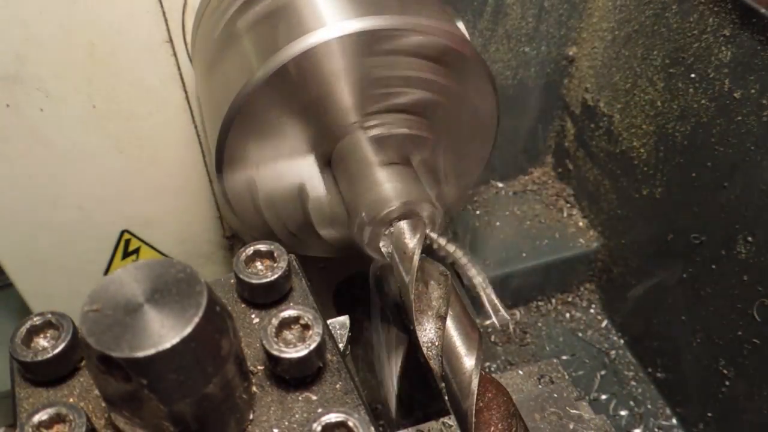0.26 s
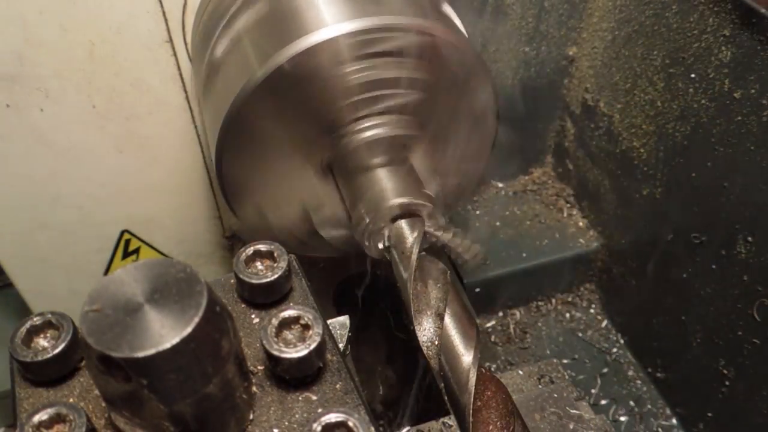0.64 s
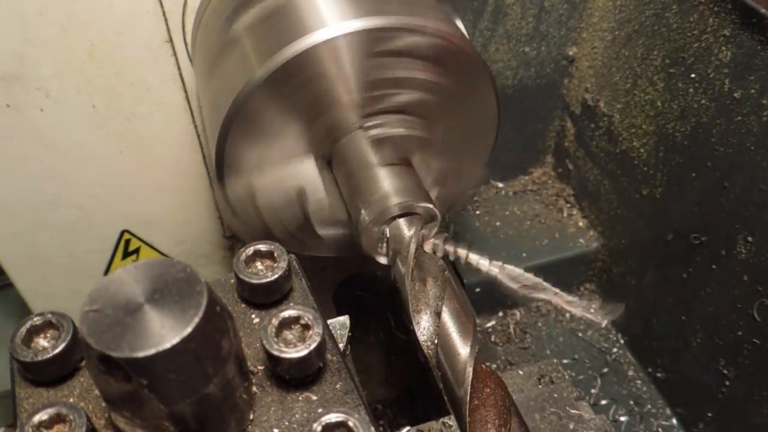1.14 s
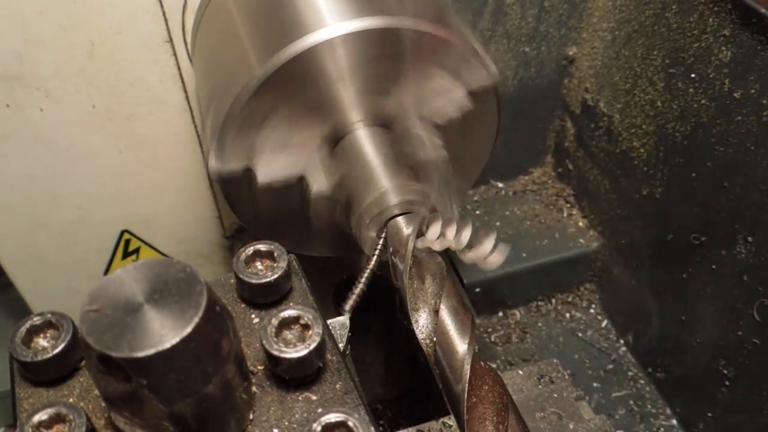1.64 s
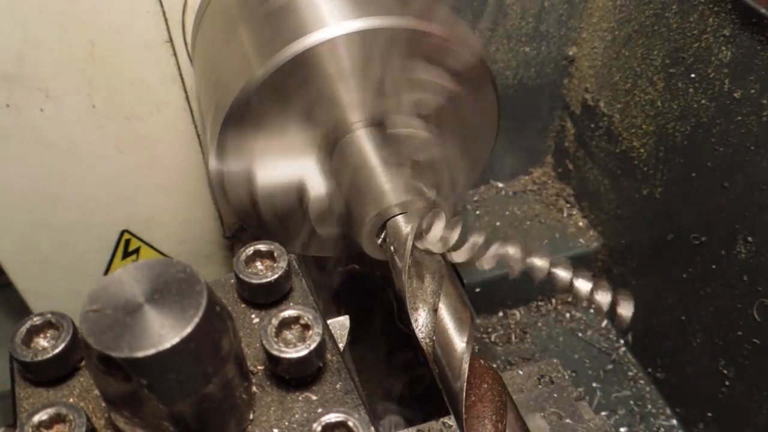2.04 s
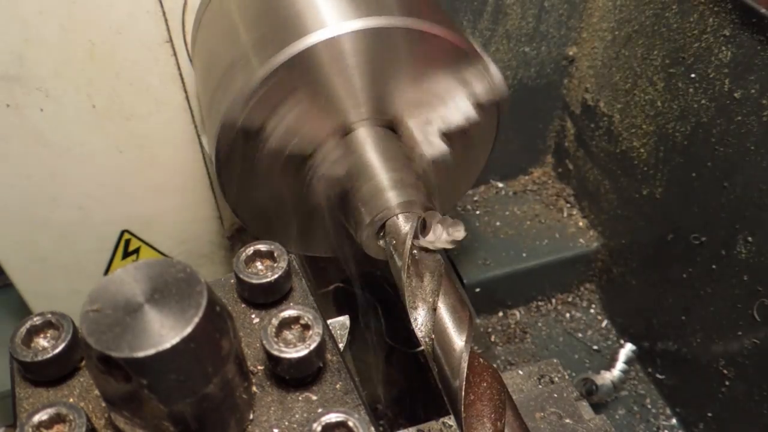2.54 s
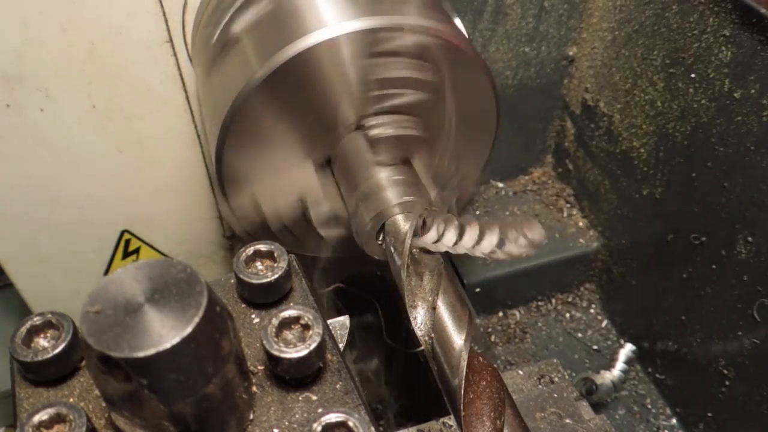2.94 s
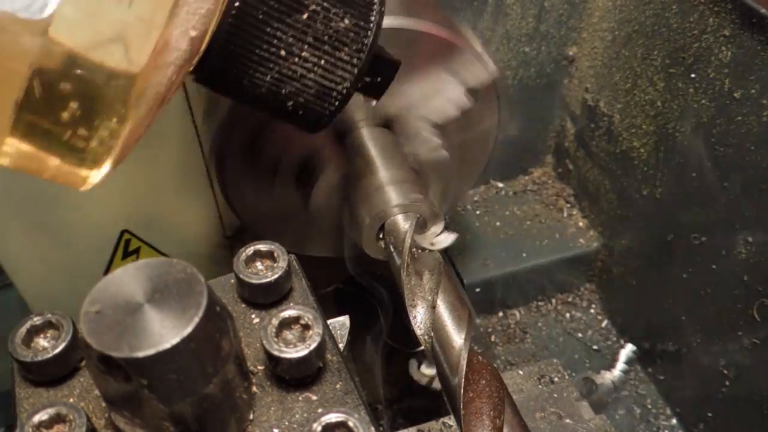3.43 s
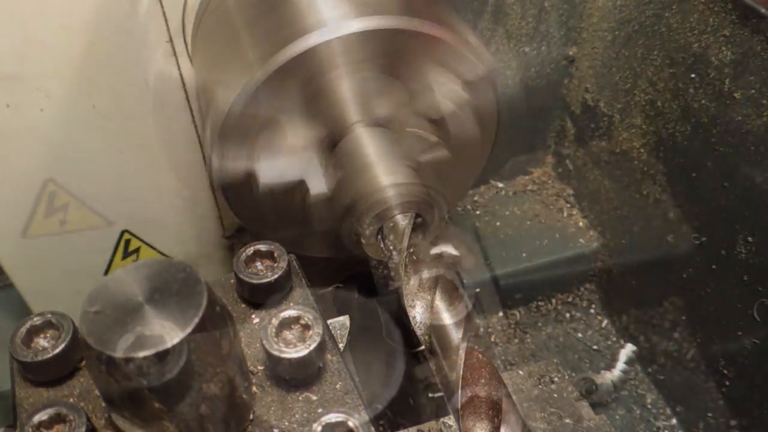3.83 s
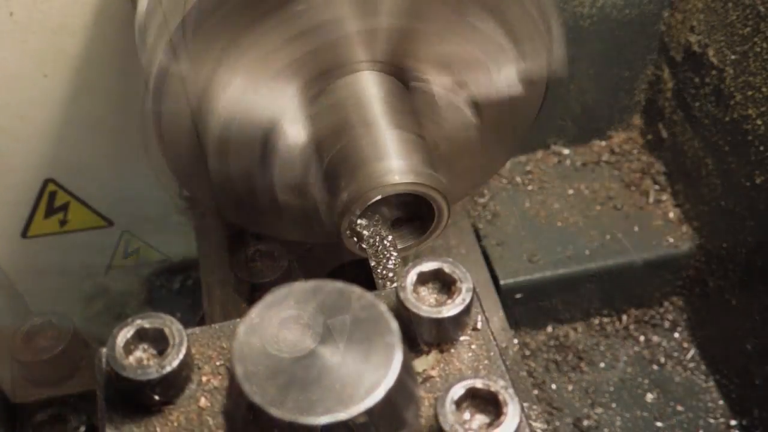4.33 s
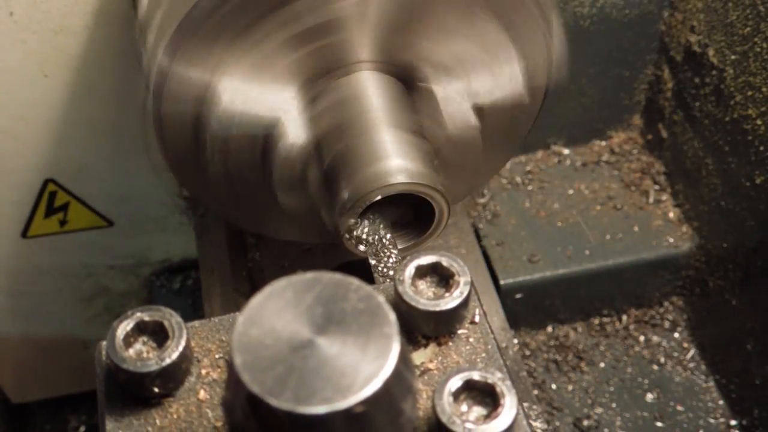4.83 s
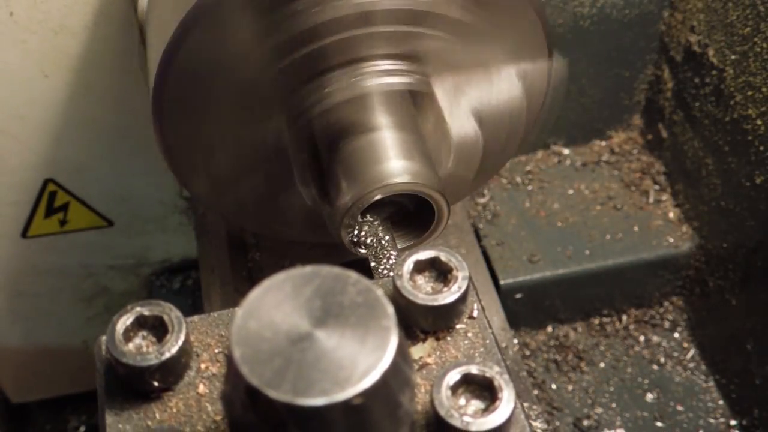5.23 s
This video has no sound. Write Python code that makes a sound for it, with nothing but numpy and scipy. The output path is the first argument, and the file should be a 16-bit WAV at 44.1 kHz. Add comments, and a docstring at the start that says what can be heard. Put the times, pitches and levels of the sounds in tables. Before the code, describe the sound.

Close metal drilling, a rough steady rasp with cracks and a brief chirping rub, gives way to soft hissing lathe work and falling squeaks.

```python
"""First a twist drill rasps and hisses into stainless steel spinning in a small lathe, straight ahead in stereo.
Friction noise rings through the resonances of drill and tool post; breaking chips knock, a loose one rubs.
The drilling fades into a light turning cut: slips at the tool tip squeal and drop in pitch as chips spit.
Behind it lie the hiss of a fine chip, the rumble and tones of the drive, and a low workshop floor."""
import sys
import numpy as np
from scipy import signal
from scipy.fft import rfft, irfft, next_fast_len
from scipy.io import wavfile

SR = 44100
rng = np.random.default_rng(int(sys.argv[2]) if len(sys.argv) > 2 else 0)


def digitize_waveform(pressure):
    """Quantize a signal to 16-bit integers and store it at the path in sys.argv[1].

    Rows of a 2-D input are taken as channels; values are limited to [-1, 1].
    """
    field = np.atleast_2d(pressure).T
    bounded = np.clip(field, -1, 1)
    quanta = np.round(bounded * 32767).astype(np.int16)
    wavfile.write(sys.argv[1], SR, quanta)


N = 241359
TIME = np.arange(N) / SR

# the flute packs with chips: (time [s], share of the duller packed colour [0-1])
FLUTE_PACKING = [(0, 0.04), (1.35, 0.19), (1.85, 0.54), (2.4, 0.6), (3.8, 0.58)]
# relative colour of the cutting lips, flute free and packed: (frequency [Hz], density [dB per Hz])
FREE_CUT_COLOUR = [(200, -23), (330, -23.5), (480, -15.5), (750, -3.5), (1200, -1.5), (1600, 2),
                   (2500, -2.5), (3200, 6), (3800, 1), (4400, 1.5), (4700, -11.5), (6000, -28)]
PACKED_CUT_COLOUR = [(180, -17.5), (300, -5.5), (470, -16), (750, -4.5), (1200, 2.5), (1900, 0),
                     (2400, 10.5), (3200, 2.5), (3800, -10), (4400, -2.5), (4700, -2), (6000, -39)]
# relative colour of the chip sliding in the flute: (frequency [Hz], density [dB per Hz])
FREE_SLIDE_COLOUR = [(3500, -43), (4800, 0), (6000, 1.5), (7600, 5.5), (8700, 2), (10800, -2.5), (13000, 2),
                     (13750, 1), (14500, -22), (15700, 7.5)]
PACKED_SLIDE_COLOUR = [(3500, 6), (4800, -0.5), (6000, 6), (7600, 0.5), (8700, 4), (10000, 7.5), (11600, 1),
                       (12500, -2), (13750, -6), (15700, -10)]
# the chip snags on the rim of the bore: (time of the middle [s], level [dB], length [s])
RIM_SNAGS = [(3.068, -22.5, 0.0067), (3.334, -21.5, 0.0043), (3.445, -25, 0.0054), (3.479, -27, 0.0074),
             (3.544, -23.5, 0.01), (3.567, -20.5, 0.0034)]


def drilling():
    """The cutting lips rasp and the chip hisses along the flute; both change colour as the flute packs."""
    rasp_db, hiss_db = drill_levels()
    packed = np.clip(in_time(FLUTE_PACKING)[0], 0, 1)

    def voiced(force, free_colour, packed_colour):
        """Blend the free and the packed sound of one contact force."""
        free = rms_one(through_tool(coloured(force, free_colour)))
        full = rms_one(through_tool(coloured(force, packed_colour)))
        return rms_one((1 - packed) * free + packed * full)

    cutting = friction(grains_per_s=2500, grain_db=-6.5, surge_db=0.77, surge_rate_hz=130)
    rasp = voiced(cutting, FREE_CUT_COLOUR, PACKED_CUT_COLOUR)
    sliding = friction(grains_per_s=1200, grain_db=-7.5, surge_db=1.3, surge_rate_hz=52)
    hiss = voiced(sliding, FREE_SLIDE_COLOUR, PACKED_SLIDE_COLOUR)
    # the chip comes off unevenly
    load = from_db(.65 * drift(45))
    cut = load * (from_db(rasp_db) * rasp + from_db(hiss_db) * hiss)
    snags = sum(swell(*snag) for snag in RIM_SNAGS)
    return cut + snags * (hiss + 0.41 * rasp)


# feed on the drill: (time [s], rasp level [dB], hiss level [dB])
DRILL_FEED = [(0, -21.5, -27), (.35, -21, -24), (1.3, -20, -25), (1.7, -20.5, -27), (2.1, -20.5, -25),
              (2.42, -21, -30), (3.2, -22.5, -29), (3.37, -22.5, -25.5), (3.6, -28.5, -29.5),
              (3.75, -26, -36.5)]
# the lips bite or slip: (time of the middle [s], length [s], change of rasp [dB], change of hiss [dB])
LIP_BITES = [(1.535, 0.027, -2.5, -6), (1.596, 0.01, 1.5, 2), (2.238, 0.11, -14, -3.5),
             (2.315, 0.044, -1.5, -9), (2.637, 0.035, 3, 5), (2.717, 0.071, -2.5, -0.5),
             (2.906, 0.035, -0.5, 4), (3.03, 0.044, 3, 3)]
FADE_START_S, FADE_DB_PER_S = 3.736, 49


def drill_levels():
    """Rasp and hiss in dB: the feed sets them, bites and slips swing them, and at last they fade."""
    fade_db = FADE_DB_PER_S * np.maximum(TIME - FADE_START_S, 0)
    rasp_db, hiss_db = in_time(DRILL_FEED) - fade_db
    for s, length, rasp_change, hiss_change in LIP_BITES:
        bite = swell(s, 0, length)
        rasp_db = rasp_db + rasp_change * bite
        hiss_db = hiss_db + hiss_change * bite
    return rasp_db, hiss_db


# resonances and hollows of drill, chuck and tool post: (frequency [Hz], width [Hz], lift [dB])
TOOLING_MODES = [(203, 39, -18), (281, 11.5, 9), (392, 9.6, 13.5), (569, 75, 13), (612, 23, -30),
                 (767.5, 19.4, 10), (812, 66, 3), (949.3, 10.5, 10.5), (992, 22.3, 11.5), (1078, 35, 3.5),
                 (1204, 100, -9.5), (1232, 6.1, 11.5), (1328, 29, 10.5), (1574, 146, 4.5), (1664, 33, 8),
                 (1760, 120, 1.5), (1960, 25, 7.5), (2230, 21, 9.5), (2200, 20, -7), (2293, 47, 6),
                 (2477, 49, 3.5), (2638, 106, 5.5), (2820, 16, 9), (3060, 59, 5), (3100, 30, 2.5),
                 (3350, 104, 7), (4089, 39, 9), (4255, 86, 11.5), (4470, 24, -3.5), (6200, 42, 2),
                 (6500, 67, 1.5), (6920, 100, 6.5), (7505, 61, 14), (7780, 160, 7), (8820, 170, -4),
                 (9140, 71, 9), (10000, 100, 2.5), (11700, 130, 1.5), (11640, 70, 6.5), (11700, 26, -7),
                 (12600, 250, -4), (14600, 155, 13)]


def through_tool(x):
    """Each resonance of the tooling lifts a narrow band, each hollow lowers one."""
    for hz, width, lift_db in TOOLING_MODES:
        band = signal.lfilter(*signal.iirpeak(hz, hz / width, fs=SR), x)
        x = x + (from_db(lift_db) - 1) * band
    return x


# the drill sings in a bending mode: (time of the middle [s], frequency [Hz], level [dB], length [s])
SINGING_MOMENTS = [(1.39, 563, -31, 0.041), (1.683, 550, -24, 0.01), (1.792, 559, -30, 0.068),
                   (1.905, 560, -40, .03), (2.02, 541, -28, 0.013), (2.164, 752, -24.5, 0.014)]


def drill_song():
    """Rubbing feeds a bending mode of the drill for a moment."""
    waver = 2 * np.pi * np.cumsum(12 * drift(46.5)) / SR
    unsteady = from_db(2.0 * drift(40))
    song = sum(swell(s, db, length) * np.sin(2 * np.pi * hz * TIME + waver)
               for s, hz, db, length in SINGING_MOMENTS)
    return unsteady * song


# chip breaking: (time [s], strength [dB], rebound delay [s], rebound against the break [dB])
CHIP_BREAKS = [(1.643, -0.5, .007, -11), (2.134, -2, .007, -19), (2.685, -1, 0.0054, -11),
               (2.848, 1.5, 0.0062, -16), (3.8315, -5.5, .004, -21), (3.9929, -12.5, 0.0085, -4.5)]
# heavily damped bending of the drill after a break: (frequency [Hz], level [dB], 60 dB decay [s])
DRILL_KNOCK_MODES = [(740, -23, 0.042), (1180, -9.5, 0.046), (1600, -6.5, 0.01), (2980, -8, 0.0069)]


def chip_breaks(crack_db=-11, crack_decay_s=.003, thud_db=-16, thud_decay_s=0.00056):
    """A breaking chip jolts the drill: a crack, a knock and a quick rebound, ringing on in the tooling."""
    clicks = np.zeros(N)
    for s, db, delay, rebound_db in CHIP_BREAKS:
        clicks[round(s * SR)] += from_db(db)
        clicks[round((s + delay) * SR)] += from_db(db + rebound_db)

    def dying(decay_s):
        """Every click decays exponentially."""
        return signal.lfilter([1], [1, -np.exp(-1 / (decay_s * SR))], clicks + 1e-18)

    # neighbouring modes start in opposite directions
    knock = sum((-1) ** k * from_db(db) * ring(clicks, hz, t60)
                for k, (hz, db, t60) in enumerate(DRILL_KNOCK_MODES))
    crack_colour = [(500, -21), (1400, -10.0), (4500, -11.5), (8000, -18.5), (15000, -27)]  # Hz, dB per Hz
    crack = dying(crack_decay_s) * rms_one(coloured(rng.standard_normal(N), crack_colour))
    thud = from_db(thud_db) * dying(thud_decay_s)
    # the thud alone bypasses the tooling
    return through_tool(knock + from_db(crack_db) * crack) + thud


# a loose chip rubbing in the flute: (time [s], level [dB])
RUB_LEVEL = [(2.09, -78), (2.13, -23.5), (2.19, -17), (2.24, -23), (2.275, -26), (2.31, -73)]
# relative colour of its hiss: (frequency [Hz], density [dB per Hz])
RUB_HISS_COLOUR = [(3000, -3), (5300, -8), (6200, 1), (7000, -4), (8600, -10), (9400, -1), (10400, -5),
                   (11400, -11), (13200, -9), (13700, -10), (14400, -14), (15300, -4)]
# bending modes in which it chirps: (frequency [Hz], level against its hiss [dB])
CHIP_CHIRP_MODES = [(6180, -11), (6850, -5), (11350, -8), (11950, -11), (13000, -6)]


def chip_rub():
    """A loose chip dragged round the bore hisses, and its modes chirp, each swelling and fading at random."""
    rubbing = friction(grains_per_s=1500, grain_db=-23, surge_db=3.5, surge_rate_hz=97)
    hiss = rms_one(coloured(rubbing, RUB_HISS_COLOUR))
    chirps = 0
    for hz, db in CHIP_CHIRP_MODES:
        tone = narrow_noise(2 * np.pi * hz * TIME, width_hz=130)
        chirps = chirps + from_db(db) * rms_one(tone * from_db(5.7 * drift(90)))
    return from_db(in_time(RUB_LEVEL)[0]) * rms_one(hiss + chirps)


# held squeals of the turning tip: (start [s], length [s], settled pitch [Hz], level [dB])
SQUEAL_LOCKS = [(3.713, 0.12, 1950, -31.5), (3.894, 0.076, 1970, -28), (4.804, 0.078, 2040, -28),
                (4.883, 0.0086, 1920, -23), (4.899, 0.044, 2030, -28), (4.957, 0.15, 2050, -26.5),
                (5.11, 0.111, 1957, -22.5), (5.223, 0.078, 2107, -25), (5.302, .152, 2534, -23.5)]
# free skidding of the turning tip: (time [s], level [dB])
FREE_SKID = [(3.95, -42.5), (4.25, -40.5), (4.419, -40.5), (4.56, -37), (4.61, -30.5), (4.68, -34),
             (4.779, -31.5)]
# each lock starts a little sharp and settles
LOCK_ATTACK_S, LOCK_RELEASE_S, LOCK_SHARP_HZ, LOCK_SETTLE_S = .005, 0.0054, 80, 0.00977
SKID_HZ = 3447


def squeal():
    """Held squeals of the locked tip come early and late, with a hoarse free skid mostly between them."""
    hz, gain = LOCK_HZ, 0
    for s, length, pitch_hz, db in SQUEAL_LOCKS:
        settling = pitch_hz + LOCK_SHARP_HZ * np.exp(-np.clip((TIME - s) / LOCK_SETTLE_S, 0, 40))
        hz = np.where(TIME < s, hz, settling)
        gain = gain + from_db(db) * gate(s, s + length, LOCK_ATTACK_S, LOCK_RELEASE_S)
    skidding = gate(FREE_SKID[0][0], FREE_SKID[-1][0], LOCK_ATTACK_S, LOCK_RELEASE_S)
    free = from_db(in_time(FREE_SKID)[0]) * skidding
    return gain * stick_slip(hz, LOCK_WIDTH_HZ) + free * stick_slip(SKID_HZ, LOCK_WIDTH_HZ)


# the line widens as the pitch rises above the lock; WIDENING is Hz of width per Hz of pitch
LOCK_HZ, LOCK_WIDTH_HZ, WIDENING, WIDEST_HZ = 1950, 13, 0.38, 380


def stick_slip(hz, narrowest_hz, overtone_db=-25, screech_db=-8, flutter_db=1.0,
               curl_hz=38, curl_db=1.5, skid_width_hz=80):
    """Stick-slip at the tool tip: low and pure when it locks, high and hoarse when it skids."""
    width = np.minimum(narrowest_hz + WIDENING * np.maximum(hz - LOCK_HZ, 0), WIDEST_HZ)
    # uneven slips make the phase wander, which widens the line
    wander = np.sqrt(np.abs(width) * 45) * drift(250)
    # the curling chip loads and unloads the tip
    curl = np.sin(2 * np.pi * np.cumsum(curl_hz + 7 * drift(11.27)) / SR)
    phase = 2 * np.pi * np.cumsum(hz + wander - 22 * curl) / SR
    locked = np.sqrt(2) * (np.sin(phase) + from_db(overtone_db) * np.sin(2 * phase))
    grip = rms_one(from_db(curl_db * curl + flutter_db * drift(62)))
    # in a skid the slips lose step and the tone turns into narrow noise
    skid = np.clip(width / skid_width_hz, 0, 1)
    loose = narrow_noise(phase, width_hz=87)
    # a mode of the tool screeches along when the slips come near half its pitch
    mode_hz = 4860
    nearness = 1 / (1 + ((hz - mode_hz / 2) / 150) ** 4)
    screech = from_db(screech_db) * narrow_noise(2 * np.pi * mode_hz * TIME, width_hz=130) * nearness
    return np.sqrt(1 - skid ** 2) * grip * locked + skid * loose + screech


# the tip grabs: (start [s], length [s], pitch aimed at [Hz], chirp level [dB], spit level [dB])
TIP_GRABS = [(4.023, 0.0099, 2640, -40, -25), (4.191, 0.012, 2970, -28.5, -23.5),
             (4.288, 0.054, 2080, -28.5, -35), (4.512, 0.0085, 2958, -26, -30),
             (4.621, 0.017, 2280, -25, -22), (4.765, 0.03, 2385, -26, -23), (4.94, 0.018, 2106, -36, -45),
             (5.34, 0.034, 2553, -35, -22), (5.397, 0.033, 2550, -32, -26.5),
             (5.437, 0.022, 3260, -24.5, -24.5)]
# relative colour of the spitting chip: (frequency [Hz], density [dB per Hz])
SPIT_HISS_COLOUR = [(1800, -35), (3000, 3), (4300, -30), (4850, -2), (5200, -5.5), (6400, -6.5),
                    (7800, -1.5), (9000, -7.5), (11000, -1), (12600, 3), (14200, -6.5), (14600, -51)]
GRAB_ATTACK_S, GRAB_RELEASE_S, GRAB_FALL_S, GRAB_WIDTH_HZ = 0.0058, 0.0094, .009, 210


def grabs():
    """Each grab drags the skid down into a rough chirp while the chip spits off the tool."""
    hz, chirp_gain, spit_gain = SKID_HZ, 0, 0
    for s, length, aim_hz, chirp_db, spit_db in TIP_GRABS:
        falling = aim_hz + (SKID_HZ - aim_hz) * np.exp(-np.clip((TIME - s) / GRAB_FALL_S, 0, 40))
        hz = np.where(TIME < s, hz, falling)
        force = gate(s, s + length, GRAB_ATTACK_S, GRAB_RELEASE_S)
        chirp_gain = chirp_gain + from_db(chirp_db) * force
        spit_gain = spit_gain + from_db(spit_db) * force
    spitting = friction(grains_per_s=3600, grain_db=-29, surge_db=4.5, surge_rate_hz=43)
    spit = rms_one(coloured(spitting, SPIT_HISS_COLOUR))
    return chirp_gain * stick_slip(hz, GRAB_WIDTH_HZ) + spit_gain * spit


# turning cut: (time [s], hiss level [dB], drive level [dB])
TURNING_LEVELS = [(0, -90, -58.5), (3.6, -59, -46), (3.85, -40, -38), (4.1, -37.5, -38), (4.45, -35, -33.5),
                  (4.75, -34, -32), (4.9, -37, -35), (5.25, -33.5, -31.5), (5.47, -27.5, -32)]
# relative colour of the fine chip: (frequency [Hz], density [dB per Hz])
TURN_HISS_COLOUR = [(700, -44), (1100, -13), (1600, -14.5), (3000, -3.5), (5000, -7.5), (7500, -7.5),
                    (9000, -7.5), (11300, -6), (12400, 2.5), (13600, 3.5), (14200, -1), (14600, -47)]


def turning():
    """A fine chip hisses off the tool, over the drive's rumble."""
    hiss_db, drive_db = in_time(TURNING_LEVELS)
    shaving = friction(grains_per_s=1200, grain_db=-3.5, surge_db=1.0, surge_rate_hz=51)
    hiss = rms_one(coloured(shaving, TURN_HISS_COLOUR))
    return from_db(hiss_db) * hiss + from_db(drive_db) * drive()


# relative colour of the rumble: (frequency [Hz], density [dB per Hz])
RUMBLE_COLOUR = [(25, -25), (80, -16), (140, -13), (230, -11.5), (340, -5), (500, -3.5), (680, 0),
                 (820, -6), (1000, -23), (1600, -22.5)]
# gear and motor tones: (frequency [Hz], level against the rumble [dB])
GEAR_TONES = [(140, -19.5), (199, -46), (334, -13.5), (447, -13), (570, -9.5), (673, -8.5)]


def drive():
    """Motor and gears rumble, with a few tones of unsteady pitch."""
    tones = 0
    for hz, db in GEAR_TONES:
        phase = 2 * np.pi * np.cumsum(hz * (1 + 0.02076 * drift(14.36))) / SR
        tones = tones + from_db(db) * np.sqrt(2) * np.sin(phase)
    rumble = rms_one(coloured(rng.standard_normal(N), RUMBLE_COLOUR))
    return rms_one(rumble + tones)


# relative colour of the workshop's low background: (frequency [Hz], density [dB per Hz])
FLOOR_COLOUR = [(20, 19), (50, 17), (100, 9), (200, -38.5), (400, 12.5), (1000, -3)]


def workshop_floor():
    """Noise independent in left and right gives a diffuse background with no direction."""
    channels = [coloured(rng.standard_normal(N), FLOOR_COLOUR) for channel in range(2)]
    return from_db(-61) * rms_one(np.array(channels))


def friction(grains_per_s, grain_db, surge_db, surge_rate_hz):
    """Smooth sliding noise plus tiny fractures of uneven size, surging with the contact force."""
    sizes = from_db(4 * np.minimum(rng.exponential(1, N), 4)) * rng.choice([-1, 1], N)
    grains = rms_one(sizes * (rng.random(N) < grains_per_s / SR))
    surge = from_db(surge_db * drift(surge_rate_hz))
    return (rng.standard_normal(N) + from_db(grain_db) * grains) * surge


def ring(x, hz, t60):
    """A unit click sets a sine of height 1 ringing."""
    r, w = from_db(-60 / (t60 * SR)), 2 * np.pi * hz / SR
    return signal.lfilter([0, np.sin(w)], [1, -2 * r * np.cos(w), r * r], x + 1e-18)


def narrow_noise(phase, width_hz):
    """A tone that keeps losing step with itself; rms about 1."""
    return drift(width_hz) * np.cos(phase) + drift(width_hz) * np.sin(phase)


def drift(rate_hz):
    """Slow chance of spread 1: noise through two equal poles, run at an eighth of the sample rate."""
    r = np.exp(-16 * np.pi * rate_hz / SR)
    noise = rng.standard_normal(N // 8 + 4002)
    slow = signal.lfilter([1], [1, -2 * r, r * r], noise)[4000:]  # skip the filter's start
    return np.interp(np.arange(N) / 8, np.arange(len(slow)), rms_one(slow))


def swell(s, db, length):
    """A smooth rise and fall around one moment."""
    return from_db(db) * np.exp(-2 * np.minimum(((TIME - s) / length) ** 2, 20))


def gate(start, end, attack, release):
    """Rise, hold until the end, die away."""
    return np.clip((TIME - start) / attack, 0, 1) * np.exp(-np.clip((TIME - end) / release, 0, 40))


def coloured(x, spectrum):
    """Shape a sound by a (Hz, dB) spectrum that falls away beyond its ends."""
    hz, db = np.transpose(spectrum)
    size = next_fast_len(N + 4096)
    f = np.maximum(np.arange(size // 2 + 1) * SR / size, 1)
    gain = from_db(np.interp(np.log(f), np.log(hz), db))
    gain = gain * np.minimum(1, f / hz[0]) * np.minimum(1, hz[-1] / f) ** 2
    return irfft(rfft(x, size) * gain, size)[:N]


def in_time(rows):
    """Each column of a curve at every sample."""
    s, *columns = np.transpose(rows)
    return [np.interp(TIME, s, c) for c in columns]


def from_db(db):
    """Decibels to gain."""
    return 10 ** (np.asarray(db) / 20)


def rms_one(x):
    """Scale to unit power."""
    return x / np.sqrt(np.mean(x ** 2) + 1e-20)


def widened(mid, width):
    """Reflections off the machine: each frequency comes back from the side 2 to 14 ms late."""
    hz = np.arange(N + 1) * SR / (2 * N)
    delay_s = np.interp(hz, np.arange(500) * 50, rng.uniform(.002, .014, 500))
    # summing the delay over frequency gives the phase
    turns = np.cumsum(delay_s) * hz[1]
    scattered = irfft(rfft(mid, 2 * N) * np.exp(-2j * np.pi * turns))[:N]
    side = coloured(scattered, width)
    return np.array([mid + side, mid - side])


# stereo width chosen for each cut, drilling nearly mono, turning wider:
# (frequency [Hz], side over mid [dB])
DRILL_SIDE = [(100, -17), (350, -14), (700, -24.5), (2000, -90), (3600, -46.5), (5500, -27), (8000, -22.5),
              (15000, -17)]
TURN_SIDE = [(100, -15), (700, -42), (1300, -29), (2200, -25), (4400, -14.5), (8000, -6.5), (14000, -2)]


def scene():
    """Both cuts sit straight ahead, the drilling narrow and the turning wider, over a diffuse floor."""
    floor = workshop_floor()
    drill = drilling() + drill_song() + chip_breaks() + chip_rub()
    turn = squeal() + grabs() + turning()
    return widened(drill, DRILL_SIDE) + widened(turn, TURN_SIDE) + floor


def record(dry):
    """The highest peaks are rounded to stay below 0.58 and the treble above 15.9 kHz is cut."""
    rounded = dry / (1 + (dry / .58) ** 6) ** (1 / 6)
    low_pass = signal.ellip(12, .1, 90, 15900, fs=SR, output="sos")
    return signal.sosfilt(low_pass, rounded)


dry = scene()
out = record(dry)
digitize_waveform(out)
```